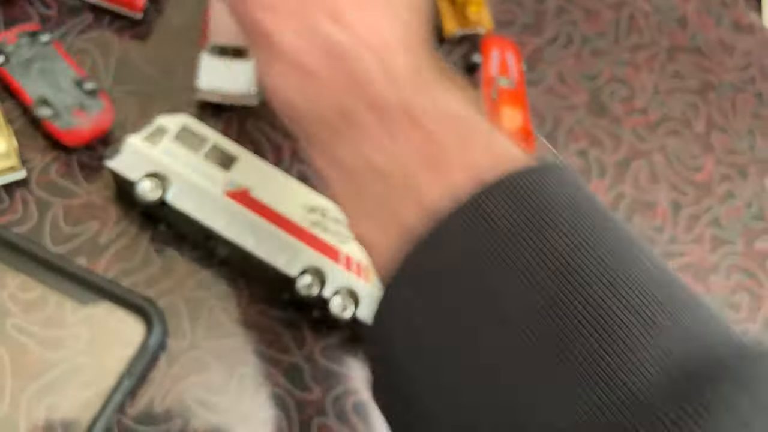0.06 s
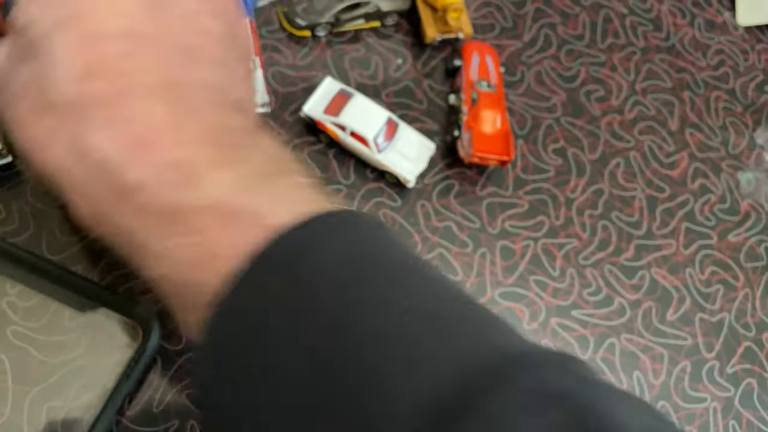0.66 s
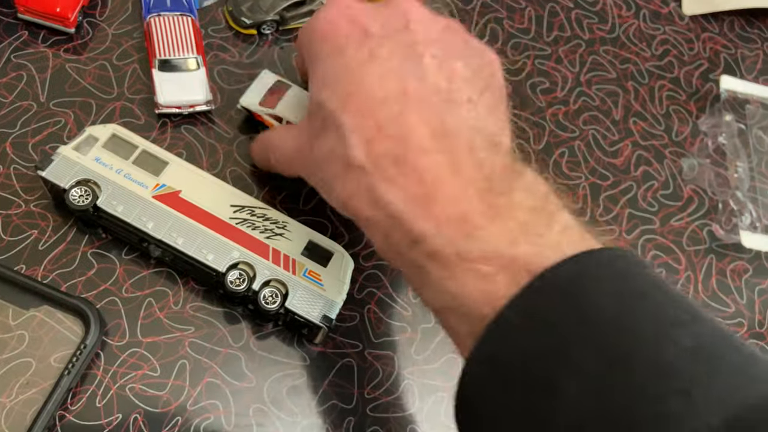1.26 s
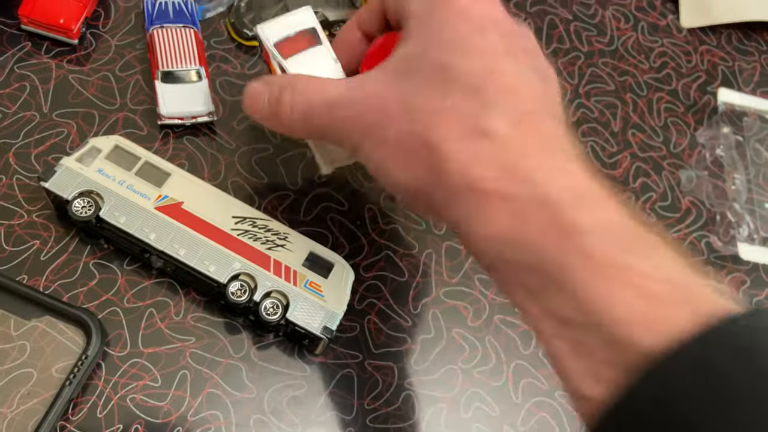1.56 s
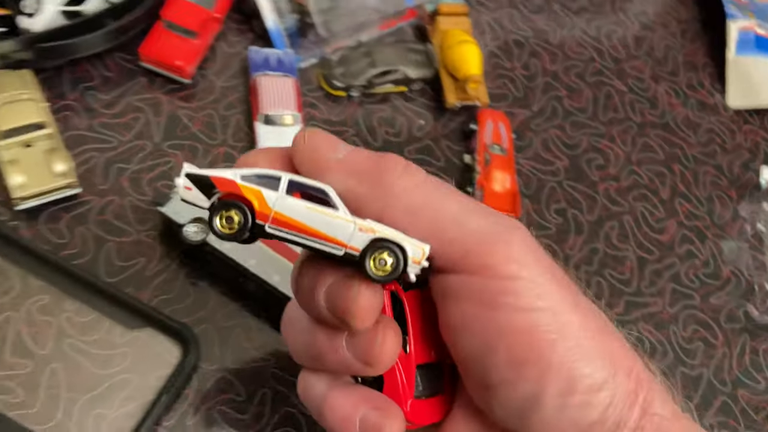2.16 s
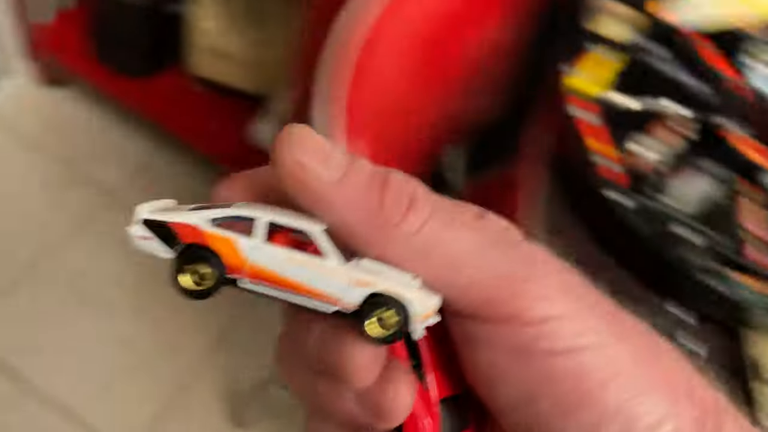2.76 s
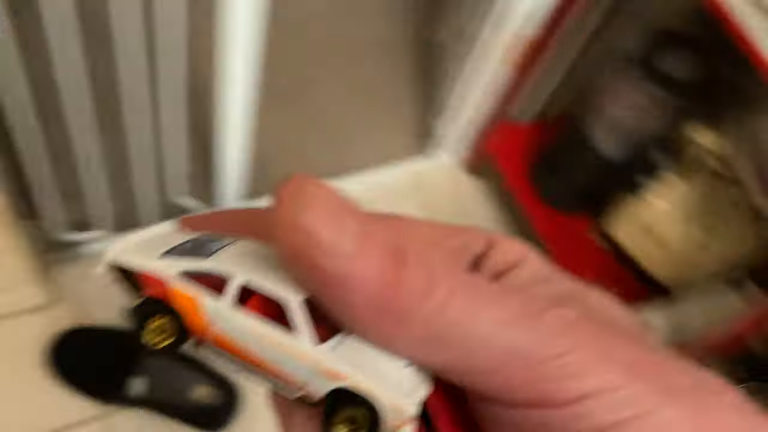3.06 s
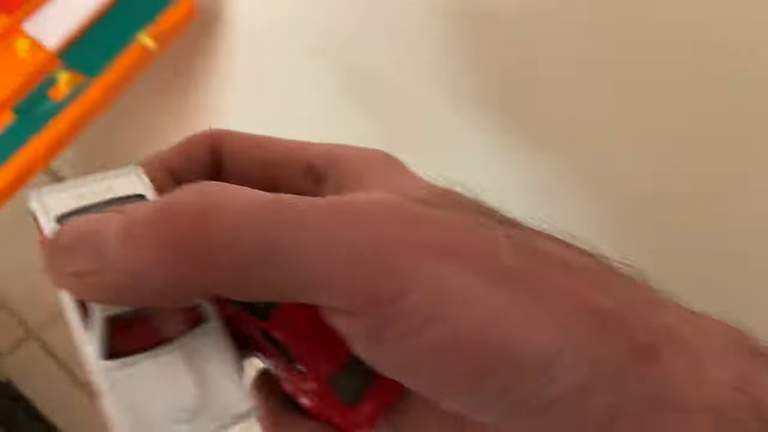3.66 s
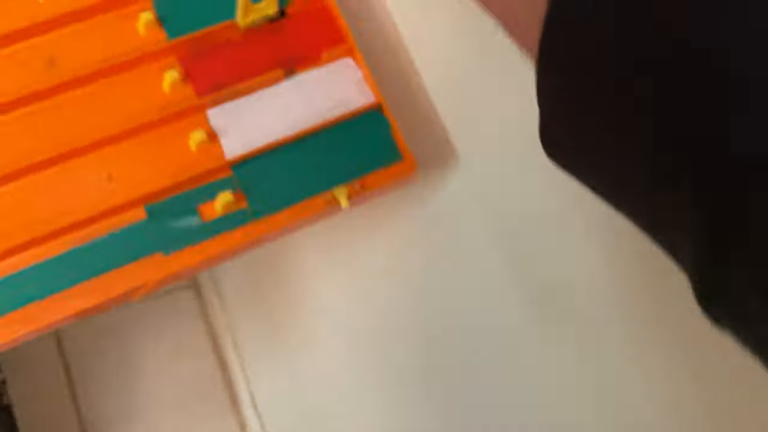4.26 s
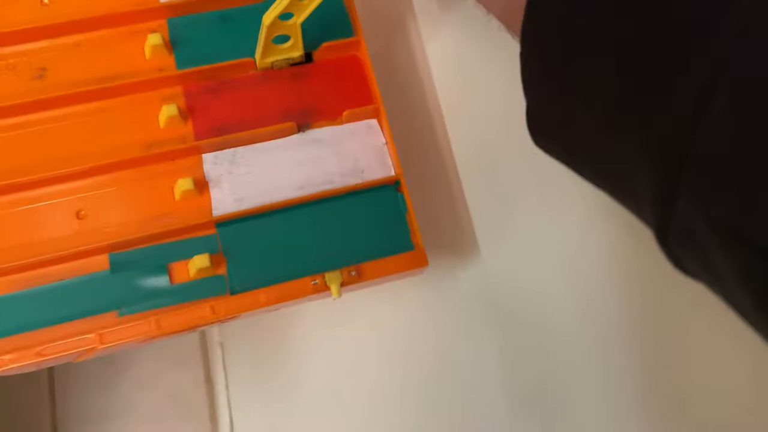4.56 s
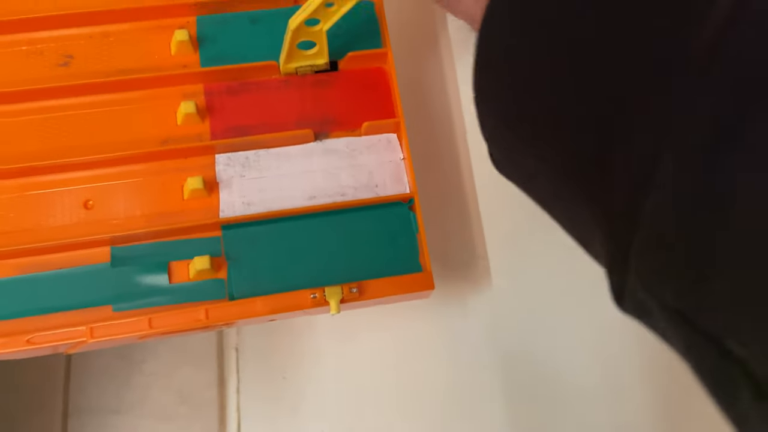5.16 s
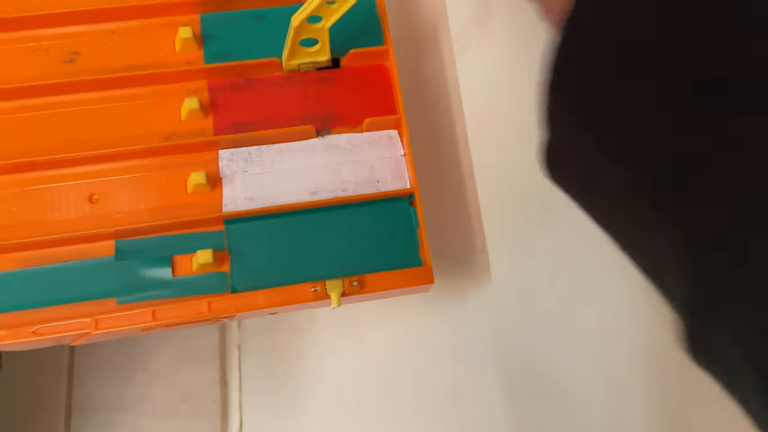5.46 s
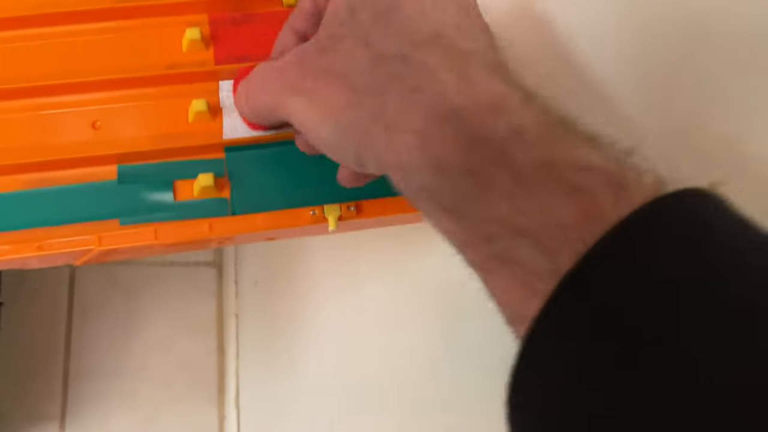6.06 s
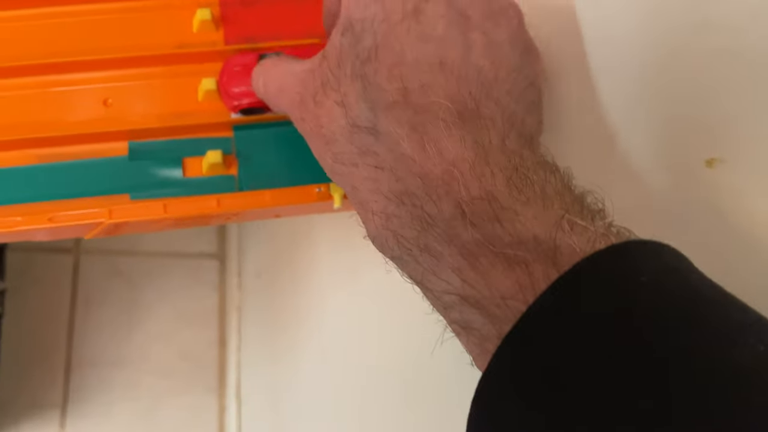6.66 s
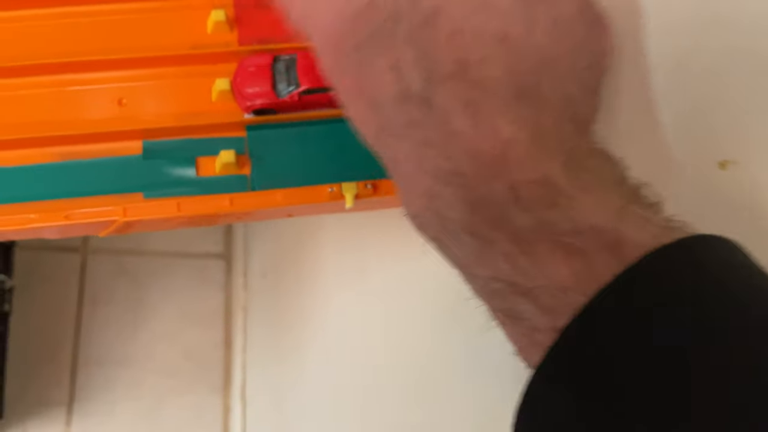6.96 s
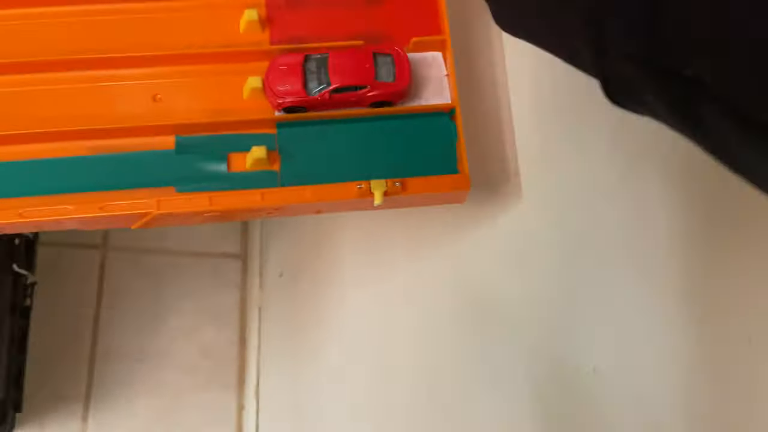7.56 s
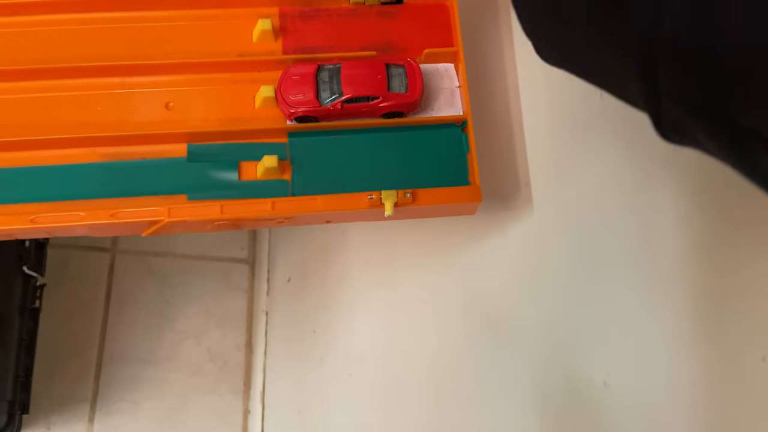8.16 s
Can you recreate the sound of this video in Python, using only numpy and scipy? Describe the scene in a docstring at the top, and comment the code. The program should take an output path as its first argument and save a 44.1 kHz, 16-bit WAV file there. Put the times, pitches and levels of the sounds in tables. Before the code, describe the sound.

Small metal toy cars knock on a table and clink in a hand, then a plastic starting gate snaps and clicks in a quiet room.

```python
"""A small, quiet room with a crowded table. Die-cast toy cars knock on the tabletop and roll on rattling
wheels as they are picked up. Their metal bodies clink in one hand while they are carried to a plastic
track, with soft bumps and a brushing sleeve. The hollow starting gate is pressed and snaps into place,
and one car is set in its lane. The hand-held microphone rumbles as it moves."""
import sys
import numpy as np
from scipy import signal
from scipy.fft import rfft, irfft, next_fast_len
from scipy.io import wavfile
from scipy.ndimage import uniform_filter1d

SR = 44100
rng = np.random.default_rng(int(sys.argv[2]) if len(sys.argv) > 2 else 0)


def materialize(psi):
    """Save the field psi as 16-bit PCM at rate SR to the path in sys.argv[1].

    A 1-D psi becomes a single channel; in a 2-D psi each row is a channel.
    """
    bounded = np.clip(np.atleast_2d(psi).T, -1, 1)
    quanta = np.round(bounded * 32767).astype(np.int16)
    wavfile.write(sys.argv[1], SR, quanta)


N = 366646
TIME = np.arange(N) / SR
HIT_SIZE, ATTACK_SIZE = 16384, 882  # samples in one hit, and in its first 20 ms
HIT_TIME, HIT_HZ = np.arange(HIT_SIZE) / SR, np.fft.rfftfreq(HIT_SIZE, 1 / SR)


def amp(db):
    """Turns decibels into a gain."""
    return 10 ** (np.asarray(db) / 20)


def unit(x):
    """Scales a sound to an average (rms) level of 1."""
    return x / np.sqrt(np.mean(x ** 2) + 1e-24)


def read(points, hz):
    """Reads between the rows of a table, on a log pitch scale."""
    pitches, values = np.transpose(points)
    return np.interp(np.log(hz + 1), np.log(pitches + 1), values)


def add(mix, start_s, sound):
    """Mixes a sound in at its start time."""
    part = mix[max(round(start_s * SR), 0):][:len(sound)]
    part += sound[:len(part)]


def noise(colour):
    """Steady noise; its colour table says how strong each pitch is."""
    size = next_fast_len(N, True)
    white = rfft(rng.standard_normal(size))
    gain = amp(read(colour, np.fft.rfftfreq(size, 1 / SR)))
    return unit(irfft(white * gain, size)[:N])


def swells(rows):
    """Each movement rises and falls in a bell curve; overlapping ones add in power."""
    bells = (amp(db) * np.exp(-((TIME - middle_s) / half_s) ** 2) for middle_s, db, half_s in rows)
    return np.sqrt(sum(bell ** 2 for bell in bells))


def clicks(size, per_s, spread_db=3):
    """Tiny clicks at random moments, most weak and a few stronger."""
    strength = amp(spread_db * np.minimum(rng.exponential(1, size), 3))
    happens = rng.random(size) < per_s / SR
    return strength * happens * rng.choice([-1, 1], size)


def shape_tone(x, gain_db):
    """Filters so that nothing sounds before the blow (minimum phase)."""
    log_gain = np.log(amp(np.r_[gain_db, gain_db[-2:0:-1]]))
    response = np.exp(np.conj(signal.hilbert(log_gain)))[:len(gain_db)]
    return irfft(rfft(x) * response, len(x))


def strike(colour, tones, contact_s, ring_db, buzz_db, buzz_s, part_hz=1000, part_db=0, part_width=.14):
    """A struck thing chatters at the contact, buzzes with many blurred tones and rings with a few."""
    t = HIT_TIME
    chatter = rng.standard_normal(HIT_SIZE) * np.sqrt(t / contact_s) * np.exp(-t / contact_s)
    buzz = rng.standard_normal(HIT_SIZE) * amp(-60 * t / buzz_s)
    lift_db = part_db * np.exp(-(np.log((HIT_HZ + 1) / part_hz) / part_width) ** 2)  # the struck part
    crack = shape_tone(unit(chatter) + amp(buzz_db) * unit(buzz), read(colour, HIT_HZ) + lift_db)
    # the grip detunes the tones a little, and the point of contact favours some of them
    detunes = 1 + .006 * rng.standard_normal(len(tones))
    favours_db = 2.5 * rng.standard_normal(len(tones))
    ring = sum(rng.choice([-1, 1]) * amp(db + favour_db - 60 * t / fade_s)
               * np.sin(2 * np.pi * hz * detune * t)
               for (hz, db, fade_s), detune, favour_db in zip(tones, detunes, favours_db))
    build_up = 1 - np.exp(-t / (.5 * contact_s))  # the ring grows while the contact lasts
    return unit(crack) + amp(ring_db) * unit(ring * build_up)


def weigh(hit, level_db, brightness, above_hz):
    """A hard blow has more treble, a soft one less; the hit's opening is set to the given level."""
    hit = shape_tone(hit, brightness * np.log2(1 + HIT_HZ / above_hz))
    return amp(level_db) * hit / np.std(hit[:ATTACK_SIZE])


def ringing_part(hz, level_db, fade_s):
    """A small part of a car or the gate rings with two close tones, the upper one louder."""
    return [(hz, level_db, fade_s), (hz * 1.04, level_db + 6, fade_s)]


# how long the room rings (a fade is a drop of 60 dB): pitch_hz, fade_s
ROOM_FADES = [(150, 0.32), (600, 0.13), (1500, 0.26), (4000, 0.23), (8000, 0.28), (15000, 0.21)]

def room(x, echo_s, echo_db, tail_db):
    """One strong echo off the nearest surface, then a short tail from the rest of the room."""
    hz, t, spectrum = signal.stft(rng.standard_normal(HIT_SIZE), SR, nperseg=256)
    fade = amp(-60 * t / read(ROOM_FADES, hz)[:, None])
    tail = signal.istft(spectrum * fade, SR, nperseg=256)[1][:HIT_SIZE]
    tail *= np.clip(HIT_TIME / 0.011, 0, 1) ** 2
    response = amp(tail_db) * tail / np.linalg.norm(tail)
    scatter = rng.standard_normal(64) * np.exp(-np.arange(64) / 16)
    add(response, echo_s, amp(echo_db) * scatter / np.linalg.norm(scatter))
    return x + signal.fftconvolve(x, response)[:N]


# colours of the hiss, the air's slow swings and the rumble: pitch_hz, level_db
HISS_COLOUR = [(25, -12.5), (50, 10), (75, 5.5), (110, -0.5), (170, -6.5), (250, -12), (400, -15.5),
               (640, -19.5), (900, -20.5), (1300, -22.5), (2000, -24), (4300, -25.5), (9000, -23.5),
               (15500, -21.5)]
DRIFT_COLOUR = [(2, -2), (5, 1.5), (9, -2.5), (16, -21.5), (30, -36), (80, -70.5), (300, -120)]
RUMBLE_COLOUR = [(5, -2), (18, 4.5), (30, -7.5), (42, -15), (58, -18), (80, -29), (130, -44.5),
                 (300, -76.5), (1000, -100)]
# sways of the hand-held microphone: middle_s, level_db, half_length_s
MIC_SWAYS = [(.05, -57, .3), (2.5, -54, .2), (3.12, -46, .34), (4, -54, .33), (5.33, -55, .14),
             (6.07, -59, .14), (8.25, -56, .15)]

def background(hiss_db=-74.5, drift_db=-51, still_db=-62.5):
    """Even hiss, slow swings of air pressure, and a deep rumble that grows when the microphone moves."""
    rumble = noise(RUMBLE_COLOUR)
    rumble /= np.sqrt(uniform_filter1d(rumble ** 2, size=8000) + 1e-3)  # evens out its level
    movement = np.hypot(amp(still_db), swells(MIC_SWAYS))
    return movement * rumble + amp(drift_db) * noise(DRIFT_COLOUR) + amp(hiss_db) * noise(HISS_COLOUR)


# steps that jolt the microphone: middle_s, level_db, pitch_hz, half_length_s
STEP_JOLTS = [(2.48, -29, 22.6, 0.029), (2.991, -27.5, 21.2, 0.0215)]

def jolts():
    """A step shakes the microphone through one or two slow swings."""
    return sum(swells([(middle_s, db, half_s)]) * np.cos(2 * np.pi * hz * (TIME - middle_s))
               for middle_s, db, hz, half_s in STEP_JOLTS)


# colour of rubbing cloth: pitch_hz, level_db
CLOTH_COLOUR = [(100, 4), (250, 0), (550, -2), (800, -5.5), (2000, -6.5), (3200, -13), (7000, -14.5),
                (15000, -23.5)]
# strokes of the sleeve: middle_s, level_db, half_length_s
SLEEVE_STROKES = [(2.65, -79.5, 0.49), (2.93, -73.5, .11), (3.12, -75, 0.18), (3.33, -75.5, 0.17),
                  (4.05, -79, 0.44), (4.8, -69, 0.066), (5.75, -83.5, 0.35), (6.25, -69.5, 0.044),
                  (6.48, -77, 0.21)]

def sleeve(grain_db=1.0):
    """Cloth and skin slide with a soft, uneven grain."""
    grain = unit(uniform_filter1d(rng.standard_normal(N), size=300))
    return swells(SLEEVE_STROKES) * amp(grain_db * grain) * noise(CLOTH_COLOUR)


# colour of a thud on the floor: pitch_hz, level_db
FLOOR_COLOUR = [(60, -3.5), (130, 3), (240, -0.5), (600, -4), (850, -8), (1100, -13.5), (1700, -10.5),
                (2500, -20), (5500, -20), (9000, -30), (16000, -42)]
# tones the floor rings with: pitch_hz, level_db, fade_s
FLOOR_TONES = [(122, 5, 0.17), (313, 4, 0.17), (460, 3, 0.13), (560, 3, 0.078), (670, 0, 0.14),
               (878, 5, 0.14), (1112, -5.5, 0.22), (1760, -9, 0.23)]
# bumps of feet and hand: start_s, level_db, brightness_db_per_octave, contact_s
DULL_BUMPS = [(2.435, -74, -3, 0.0076), (2.691, -78, 2.5, .0024), (2.785, -65, -3.5, 0.0057),
              (3.864, -65, -3.5, 0.0033), (4.675, -52, 0.1, 0.0065), (7.812, -81.5, 1, 0.0019)]

def floor_bumps():
    """Soft, heavy bumps reach the floor and make it thud."""
    out = np.zeros(N)
    for start_s, db, brightness, contact_s in DULL_BUMPS:
        hit = strike(FLOOR_COLOUR, FLOOR_TONES, contact_s, ring_db=-4.5, buzz_db=-9.5, buzz_s=0.25)
        add(out, start_s, weigh(hit, db, brightness, above_hz=400))
    return room(out, echo_s=0.016, echo_db=-7.5, tail_db=-12.5)


# colour of an axle's tick: pitch_hz, level_db
AXLE_COLOUR = [(300, -46.5), (1800, -11), (2600, -6.5), (3200, 3), (4200, -7), (6000, -7.5), (9000, -11.5),
               (15000, -29)]
# fingers shifting their grip: middle_s, level_db, half_length_s
GRIP_SHIFTS = [(1.46, -83.5, 0.076), (1.88, -85, 0.26), (3.7, -81, .11), (4.13, -73.5, 0.17),
               (5.87, -81, 0.13), (6.3, -85, 0.071)]

def axle_ticks():
    """Loose axles tick faintly while the cars shift in the fingers."""
    taps = clicks(N, per_s=160)
    burst = rng.standard_normal(HIT_SIZE) * np.exp(-HIT_TIME / 0.0029)
    tick = shape_tone(burst, read(AXLE_COLOUR, HIT_HZ))
    return unit(signal.oaconvolve(taps, tick)[:N]) * swells(GRIP_SHIFTS)


# colour of wheels on the booming tabletop: pitch_hz, level_db
WHEEL_COLOUR = [(60, 7), (150, 0.5), (330, 0.5), (470, -5), (590, 4.5), (880, 1.5), (1100, 2), (1600, -7.5),
                (2300, -13.5), (3200, -10), (6000, -6), (8700, -12), (11000, -19), (16000, -37.5)]
# pushes that set a car rolling: start_s, level_db, length_s
CAR_PUSHES = [(0, -44, .07), (0.116, -48, 0.11)]

def wheels(coast_db_per_s=60, stop_db_per_s=241):
    """Tiny wheels and axles rattle after a push, fading as the car coasts and faster once it stops."""
    rattle = shape_tone(clicks(SR, per_s=1500), read(WHEEL_COLOUR, np.fft.rfftfreq(SR, 1 / SR)))
    t, loudness = np.arange(SR) / SR, np.zeros(N)
    for start_s, db, length_s in CAR_PUSHES:
        drop_db = coast_db_per_s * np.minimum(t, length_s) + stop_db_per_s * np.maximum(t - length_s, 0)
        add(loudness, start_s, amp(db - drop_db))
    return np.pad(unit(rattle), (0, N - SR)) * loudness


# colour of a knock on the table: pitch_hz, level_db
TABLE_COLOUR = [(60, -5), (150, 3.5), (350, 7), (1100, 1), (1500, 4), (2300, -0.5), (3200, -0.5),
                (6000, -1), (8700, 2.5), (11000, -4.5), (16000, -9)]
# tones that knock rings with: pitch_hz, level_db, fade_s
TABLE_TONES = [(332, -3, 0.15), (533, -4, 0.053), (587.5, -1.5, 0.18), (680, -4, 0.23), (755, -6, 0.072),
               (868, -8, 0.22), (1100, 3, 0.093), (1207, -6, .22), (1146, -3, 0.067), (2890, -9.5, .1),
               (6060, 4.5, 0.076), (6600, 0, .1), (8260, -5.5, 0.091), (8475, -10.5, .1)]
# cars knocking on the table: start_s, level_db, brightness_db_per_octave, contact_s
TABLE_KNOCKS = [(.0003, -41, 2, 0.00099), (.0065, -38.5, 2, 0.001), (0.0183, -46.5, 2.5, .008),
                (0.078, -51, 8, 0.0011), (0.0861, -37.5, 1.9, 0.0018), (.095, -46, -2, 0.0017),
                (0.116, -45, 1, 0.0012), (0.138, -50, -1.5, 0.0018), (.188, -51, 3, .005),
                (.205, -52, -4.5, 0.008), (0.339, -72.5, -4.5, 0.0032), (0.441, -67, -3.5, 0.0048),
                (.457, -62, -5.5, 0.00094), (0.681, -75.5, -18, 0.003), (1.325, -78, -10, 0.0095)]

def tabletop():
    """Cars are nudged along the table and tip over on it."""
    out = wheels()
    for start_s, db, brightness, contact_s in TABLE_KNOCKS:
        hit = strike(TABLE_COLOUR, TABLE_TONES, contact_s, ring_db=-4, buzz_db=-0.5, buzz_s=.11)
        add(out, start_s, weigh(hit, db, brightness, above_hz=200))
    return room(out, echo_s=0.0074, echo_db=-13.0, tail_db=-10.5)


# colour of a plastic clack: pitch_hz, level_db
GATE_COLOUR = [(55, 0), (190, -1), (310, 0), (400, -7), (650, -4), (1000, -8), (1700, -4), (2700, -2),
               (4000, 2.5), (6000, 3), (8500, 0.5), (11000, -7.5), (16000, -18)]
# tones of the gate, and of the whole track as it flexes: pitch_hz, level_db, fade_s
GATE_TONES = [(180, 8.5, 0.12), (314, -13, 0.54), (413, -5, 0.19), (650, -10, 0.1), (850, -6, 0.31),
              (1185, -1.5, 0.12), (1657, 6, 0.15), (3470, -38, 0.069), (4300, 17, 0.11), (4750, 8, 0.042),
              (4810, -6, 0.11), (7400, -10, 0.56), (8260, 11, 0.11)]
TRACK_TONES = [(69.7, -4, 0.32), (118, -24.5, 0.23), (208.5, -14.5, 0.13), (307, -15, 0.17),
               (471, -23.5, 0.37)]
# blows on the gate: start_s, level_db, brightness_db_per_octave, contact_s, part_pitch_hz, part_boost_db
GATE_CLACKS = [(4.783, -65.5, -2.3, 0.0095, 1000, 16), (4.807, -69, -6, .005, 6250, 13),
               (5.2498, -44, 1.1, 0.0025, 7000, 4.5), (5.2614, -46, -0.5, 0.0011, 4930, 0),
               (5.283, -58, -6.5, 0.0032, 3650, 11), (5.006, -80.5, -1, 0.0012, 5860, 10),
               (5.5, -72.5, -2.5, 0.0024, 5170, 5), (6.061, -76, 0.5, .0017, 7900, 8),
               (6.1137, -62, -3, 0.0017, 5050, 2.5), (6.2678, -58.5, -5, 0.002, 5100, 7),
               (6.396, -58.5, -6, 0.0054, 4850, 9.5), (6.5191, -47, 0.5, 0.0047, 5660, 2.5),
               (6.534, -54, -3.5, 0.0025, 1260, 3), (6.734, -74, -10.5, .004, 2800, 14.5),
               (7.0691, -59.5, 0.1, 0.0015, 800, 15)]

def starting_gate():
    """The hollow plastic gate snaps and buzzes, and the track flexes under each blow."""
    out, t = np.zeros(N), HIT_TIME
    flex = sum(amp(db - 60 * t / fade_s) * np.sin(2 * np.pi * hz * t) for hz, db, fade_s in TRACK_TONES)
    for start_s, db, brightness, contact_s, hz, boost_db in GATE_CLACKS:
        tones = GATE_TONES + ringing_part(hz, boost_db - 8, fade_s=0.15)
        hit = strike(GATE_COLOUR, tones, contact_s, ring_db=-10.0, buzz_db=3, buzz_s=0.23,
                     part_hz=hz, part_db=boost_db, part_width=0.12)
        add(out, start_s, weigh(hit, db, brightness, above_hz=490) + amp(db) * flex)
    return room(out, echo_s=0.015, echo_db=-11.5, tail_db=-11.0)


# colour of a metal clink: pitch_hz, level_db
CAR_COLOUR = [(200, -57), (600, -25.5), (1050, -4.5), (1450, -22.5), (1750, -16), (2000, -7.5), (2400, -8),
              (2900, 0), (4400, 0.5), (6000, -1), (8500, -3.5), (12000, -13.5), (16000, -17)]
# tones of a car's body: pitch_hz, level_db, fade_s
CAR_TONES = [(1047, -0.5, 0.026), (2676, 1, 0.077), (4530, -4, 0.023), (4840, -14.5, 0.068),
             (5100, -26, 0.044), (5820, 6, 0.055), (9150, -15, 0.1), (11800, -15, 0.019)]
# cars touching in the hand: start_s, level_db, brightness_db_per_octave, contact_s, part_pitch_hz
CAR_CLINKS = [(.19, -58.5, 9, .009, 8700), (0.455, -73.5, 2, 0.0017, 10900), (.616, -73, -8, .003, 2650),
              (0.625, -74.5, 3, 0.00077, 2200), (0.8232, -69, 3.5, .0024, 3100),
              (.95, -58.5, 0.5, .0014, 5320), (1.0093, -69, -8, .001, 3730), (1.514, -81.5, 0, .003, 2780),
              (1.592, -62.5, 6, .005, 3000), (1.645, -46.5, -0.5, 0.0036, 2690),
              (1.652, -73, 2, 0.0023, 2700), (1.7196, -64, 7, 0.0062, 4300),
              (1.7708, -64.5, 5, 0.0021, 4170), (1.795, -70, 2.5, 0.0028, 3500),
              (1.832, -69.5, 9, 0.0042, 4070), (1.8746, -53.5, 1, .004, 5400), (2.042, -76, 5, .003, 3750),
              (2.481, -77, 5, 0.00064, 4000), (2.7896, -76.5, -17, 0.0012, 2250),
              (3.245, -76, -6, .005, 5730), (3.71, -73, 6, 0.013, 3430), (3.903, -70.5, 6, .0024, 3050),
              (3.988, -78, -8, 0.0073, 3030), (4.034, -61.5, -1.5, 0.0029, 3270),
              (4.171, -56.5, -1, 0.0011, 4620), (4.193, -61, -1, 0.0036, 6080)]

def clinking_cars(full_ring_db=-39.5, softening=0.35):
    """Metal bodies clink: a hard blow rings the whole car, a light touch mostly the part it meets."""
    out = np.zeros(N)
    for start_s, db, brightness, contact_s, hz in CAR_CLINKS:
        body_db = softening * min(db - full_ring_db, 0)
        tones = [(tone_hz, tone_db + body_db, fade_s) for tone_hz, tone_db, fade_s in CAR_TONES]
        tones += ringing_part(hz, level_db=1.5, fade_s=0.026)
        hit = strike(CAR_COLOUR, tones, contact_s, ring_db=-7, buzz_db=-3.5, buzz_s=0.029,
                     part_hz=hz, part_db=-0.5 - body_db, part_width=.13)
        add(out, start_s, weigh(hit, db, brightness, above_hz=4200))
    return room(out, echo_s=0.0087, echo_db=-5.0, tail_db=-6.0)


def scene():
    """All the sounds meet at one microphone."""
    toys = tabletop() + clinking_cars() + axle_ticks() + starting_gate()
    return (toys + floor_bumps() + sleeve() + jolts() + background())[None]


def record(dry):
    """Cuts off the very highest treble."""
    low_pass = signal.firwin(511, 15900, window=("kaiser", 9), fs=SR)
    return signal.oaconvolve(dry, low_pass[None], "same")


dry = scene()
out = record(dry)
materialize(out)
```